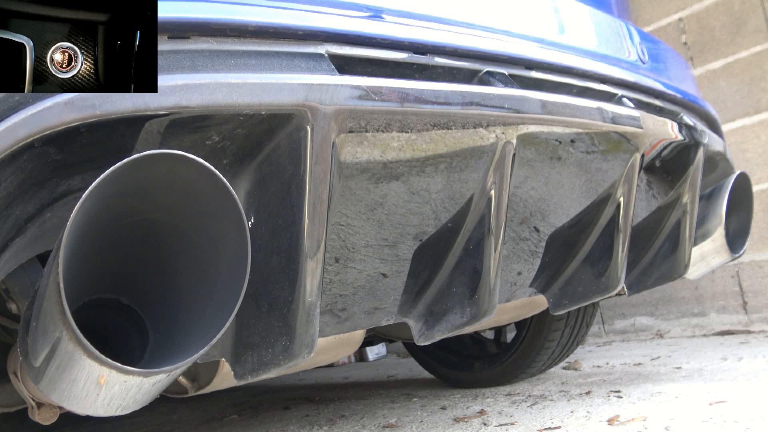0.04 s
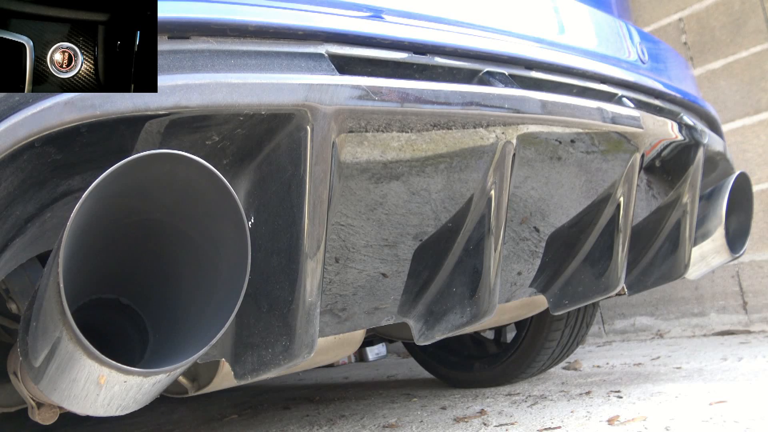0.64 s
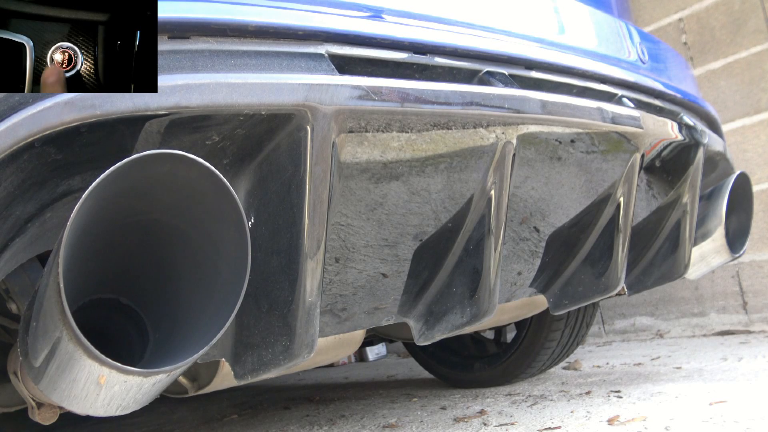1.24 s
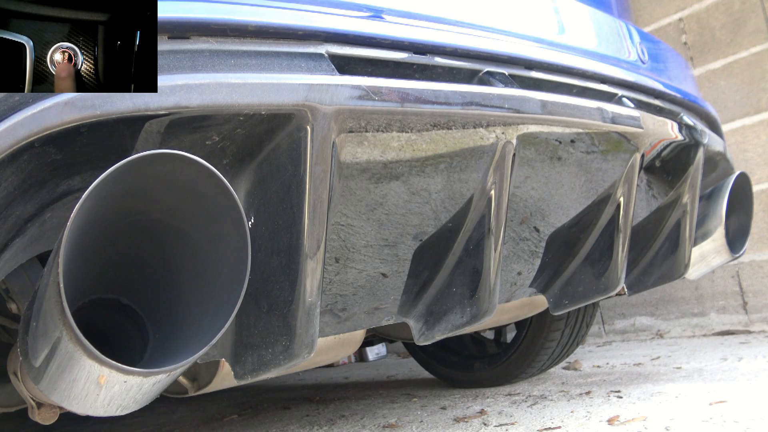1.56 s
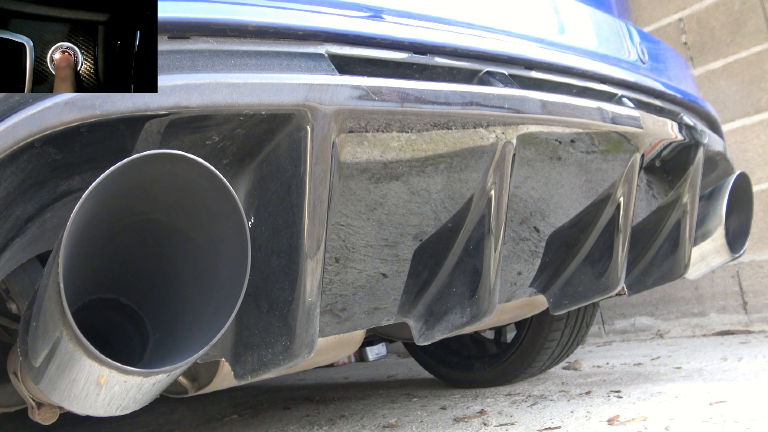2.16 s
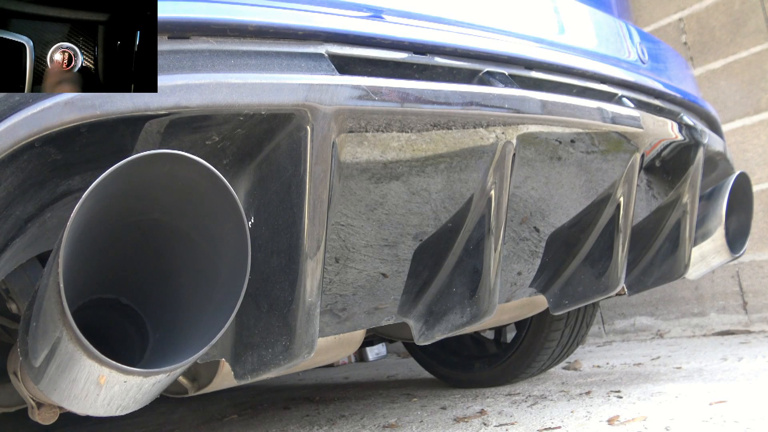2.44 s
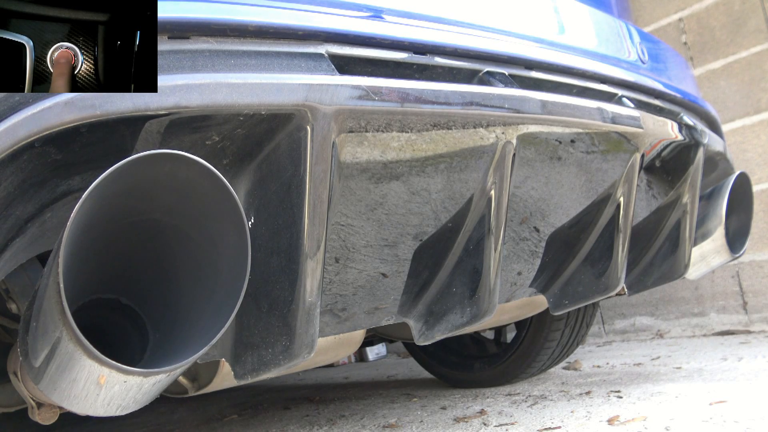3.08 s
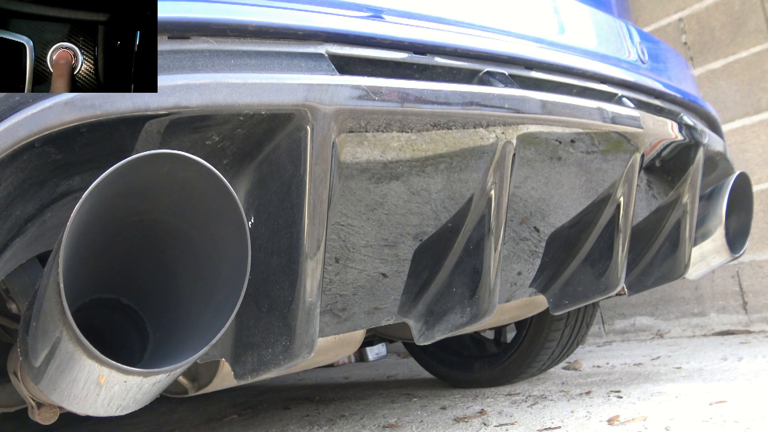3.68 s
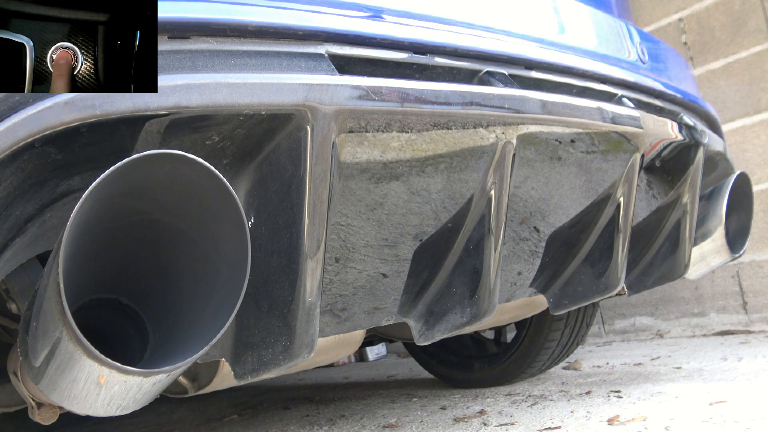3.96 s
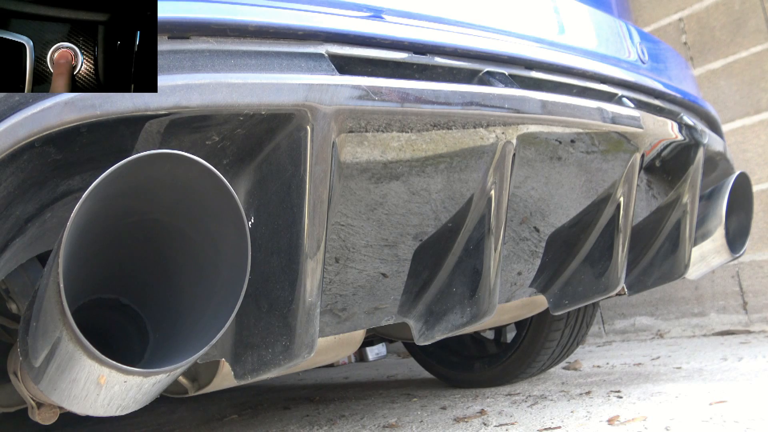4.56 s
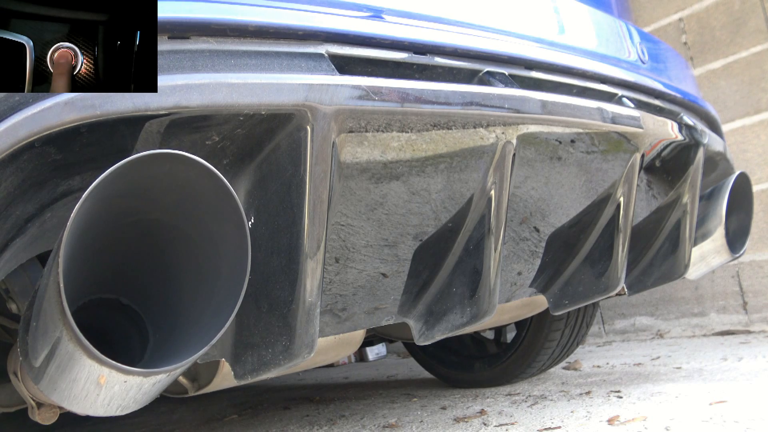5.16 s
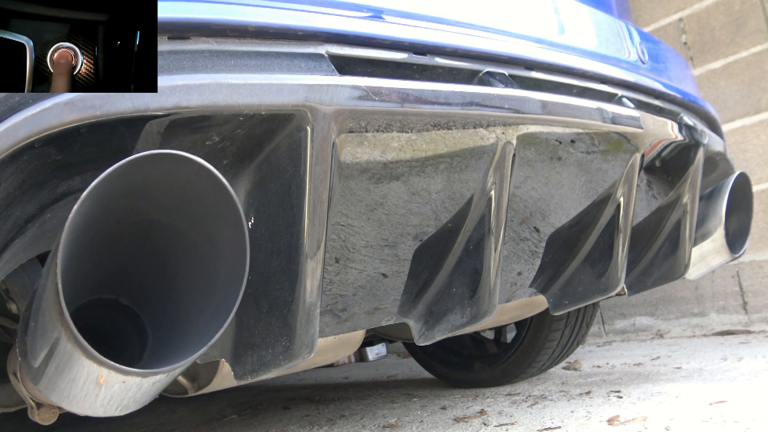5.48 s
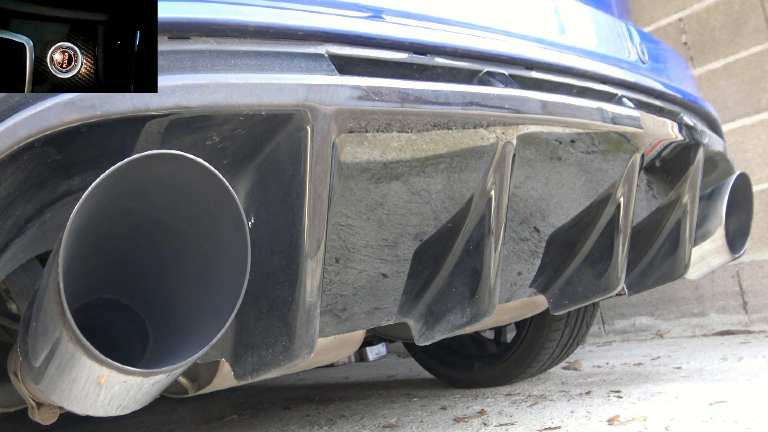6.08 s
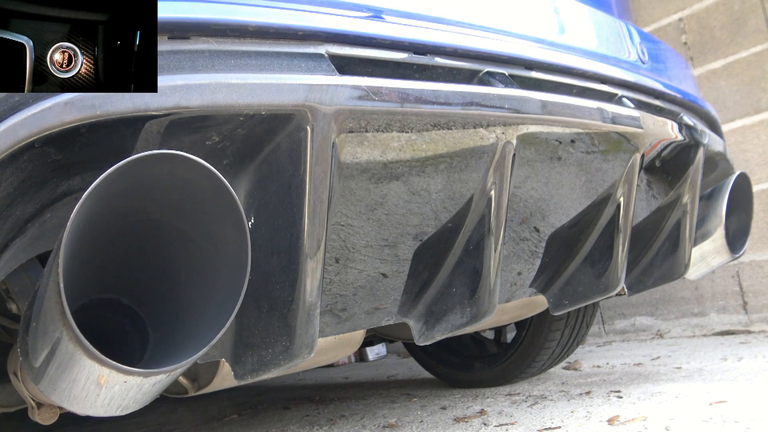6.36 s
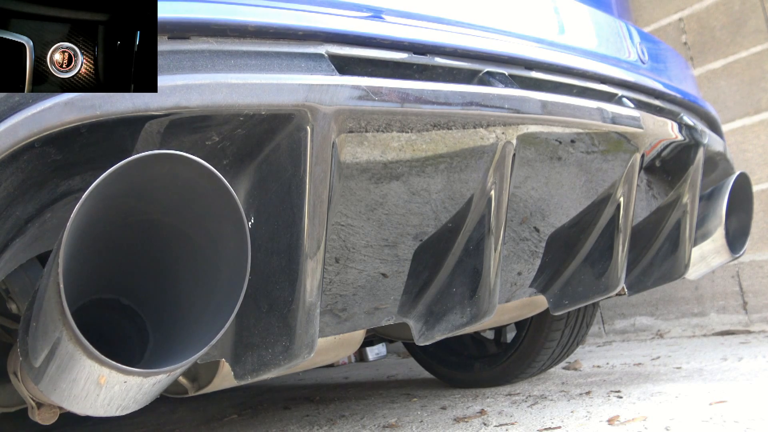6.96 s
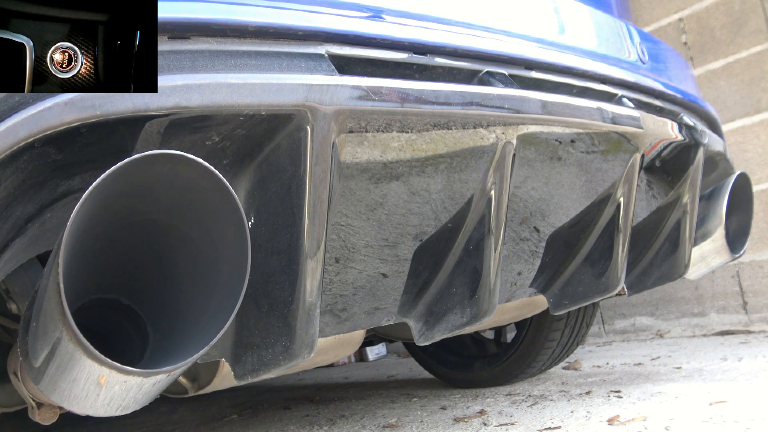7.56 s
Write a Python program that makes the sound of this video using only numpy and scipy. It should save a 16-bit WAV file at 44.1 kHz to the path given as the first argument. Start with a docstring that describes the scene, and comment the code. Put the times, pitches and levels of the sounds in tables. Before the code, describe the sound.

A car starts from cold, with the microphone close to the exhaust pipe outdoors. At first there is only faint still air with a few soft scuffs and dull knocks. Then come a clunk, a thin high whine and a short burst of metallic cranking with bass puffs. The engine fires loudly and raggedly, rises briefly in pitch and holds a deep, fast idle, rasping and hissing.

```python
"""Cold start of a car with five cylinders on each exhaust pipe, heard close to a tailpipe beside a wall.
Over a quiet yard come soft knocks and scuffs. A relay clunks and a pump whines up; the starter bites and
grinds while unfired cylinders puff through the silencer. The engine catches with a run of cracks, flares
briefly and settles into a fast, booming idle, each firing ringing the pipe and rasping out of its tip."""
import sys
import numpy as np
from scipy import signal
from scipy.fft import rfft, irfft
from scipy.io import wavfile

SR = 44100
rng = np.random.default_rng(int(sys.argv[2]) if len(sys.argv) > 2 else 0)


def int16_out(signal):
    """Quantize to a 16-bit WAV file."""
    q = np.round(np.clip(np.atleast_2d(signal).T, -1, 1) * 32767)
    wavfile.write(sys.argv[1], SR, q.astype(np.int16))


N = 345303
TIME = np.arange(N) / SR
BINS = np.maximum(np.arange(N // 2 + 1) * SR / N, 1)

# Levels are relative within each table; noise colours give the level per Hz.
# colour of the yard's still air: f/Hz, level/dB
YARD_AIR = [(13, -47), (22, -19), (44, 0), (76, -4.5), (102, -1.5), (135, -9), (220, -3.5), (267, -12),
            (306, -9), (625, -16.5), (869, -16.5), (2910, -35.5), (13900, -40), (15500, -46)]
# stereo width of the yard: f/Hz, side minus mid/dB
AIR_WIDTH = [(60, -25), (250, -16.5), (1200, -14), (2400, -19), (4400, -13), (8000, -1), (15000, -13)]
# balance of the yard and of the exhaust: f/Hz, left minus right/dB
AIR_PAN = [(60, -0.092), (240, -1.7), (950, -1.4), (3770, 0.24), (15000, 0.0)]
EXHAUST_PAN = [(60, -2.0), (110, -2), (200, 4.5), (380, 1.0), (700, 2.5), (1290, 1.5), (2380, 2.5),
               (4400, 2.5), (8120, 2.0), (15000, 0.5)]
# scuffs and rustles: t/s, level/dB, rise/s, t60/s, centre f/Hz, upper edge over centre
SCUFF_CUES = [(1.048, -57.5, 0.0033, 0.17, 6500, 1.7), (1.237, -43.5, 0.0027, 0.15, 2500, 2.2),
              (1.254, -43.5, 0.0054, 0.27, 1750, 1.5), (1.29, -43, 0.0031, 0.28, 8450, 1.4),
              (1.292, -47.5, 0.0028, 0.29, 5030, 1.12), (1.685, -54, .005, 0.34, 2500, 2.4),
              (1.745, -52.5, 0.037, 0.49, 1990, 2.0), (1.798, -42.5, 0.023, 0.22, 2200, 3.9),
              (4.617, -59, .004, .3, 4000, 2.3), (4.68, -49.5, 0.032, 0.36, 4000, 3.4),
              (4.775, -50, 0.0053, .8, 7000, 2.1)]
# dull knocks: t/s, level/dB, rise/s, t60/s, low cut f/Hz
KNOCK_CUES = [(1.115, -40.5, 0.035, 0.36, 280), (1.152, -55, .015, 0.21, 380),
              (1.42, -44.5, 0.022, .2, 230), (1.525, -45.5, .012, 0.17, 150), (1.81, -47, 0.12, .2, 130),
              (4.67, -47.5, 0.03, 0.2, 90), (4.789, -21.5, 0.014, 0.13, 80), (4.83, -43, .01, 0.39, 80),
              (4.885, -27, 0.023, 0.47, 130)]
# colours of the scuffs and of the knocks: f/Hz, level/dB
SCUFF_COLOUR = [(400, 13.5), (9000, -9), (15000, -13)]
KNOCK_COLOUR = [(50, -5), (110, 4.5), (170, 4), (220, -16), (320, 0.5), (560, -5), (750, -16.5),
                (1500, -25.5), (4000, -45)]
# ring of the relay: f/Hz, width/Hz, level/dB
RELAY_MODES = [(1420, 70, -4), (2313, 35, 9), (2880, 40, -8), (3270, 32, 0), (4220, 45, -12),
               (4900, 50, -7), (5450, 50, -13)]
# whine of the pump at nominal speed: f/Hz, level/dB
PUMP_PARTIALS = [(4790, -59), (9580, -50.5), (14370, -67)]
# colours of the pinion's slam, the gear mesh and the rasp of the teeth: f/Hz, level/dB
BITE_COLOUR = [(300, -8), (480, -6), (660, 10.5), (950, -19), (1300, -1), (2100, 4.5), (4000, -1.5),
               (6000, -9), (9000, -11), (15000, -30)]
MESH_COLOUR = [(90, 0), (200, -2), (320, 2.5), (480, -7.5), (650, -2), (1000, 0), (1350, -1), (1900, 1),
               (3000, -2), (4500, -7), (6000, -18)]
TEETH_COLOUR = [(3500, -4.5), (5200, -1), (7000, -2.5), (9000, -4), (11000, -9.5), (13000, -18),
                (15500, -35)]
# ring of the starter and bell housing: f/Hz, width/Hz, level/dB
HOUSING_MODES = [(318, 19, -9), (900, 22, 3), (1266, 42, 1.5), (1866, 77, 0.5), (2480, 56, -6),
                 (3276, 35, -4), (3670, 25, -3), (4470, 92, -18), (4700, 30, -3.5), (4950, 35, -12),
                 (5300, 270, -10), (5970, 130, -22)]
# the starter straining against each compression: t/s, level/dB, half length/s
STRAINS = [(4.99, -19, 0.094), (5.163, -16, 0.056), (5.314, -17.5, 0.058)]
# air pushed out by unfired cylinders: t/s, level/dB, f/Hz
PUFF_CUES = [(5.077, -13, 41), (5.221, -13, 45.6), (5.347, -10.5, 54.5)]
# sharp first firings: t/s, level/dB
CRACK_CUES = [(5.3948, -8.5), (5.4345, -14), (5.4884, -12.5), (5.51, -13), (5.5316, -11), (5.5737, -10),
              (5.677, -16.5), (5.709, -12)]
# colours of those cracks and of the uneven burns' rumble: f/Hz, level/dB
CRACK_COLOUR = [(500, 5), (3000, -1), (9000, -2), (15000, -16)]
RUMBLE_COLOUR = [(22, -2), (32, 0), (60, -2.5), (105, 0), (150, -9), (200, -8.5)]
# punch of each cylinder in firing order: level/dB
CYLINDERS = [0.9, 0.4, 0.3, -2.7, -0.8]
# notes above the boom, and the growl of unequal cylinders: multiple of the firing rate, level/dB
BOOM_OVERTONES = [(2, 0.5), (3, -2.5), (4, -12.5)]
GROWL_ORDERS = [(3.4, -6), (3.6, -5), (4.4, -7), (4.6, 2.5), (4.8, -4), (5.4, -1), (5.6, -5), (6.4, -8),
                (8, -8), (8.6, -6), (13, -14), (16.6, -12)]
# ring of the pipe, and of its tip under the gas jet: f/Hz, width/Hz, level/dB
PIPE_MODES = [(250, 23, -9.5), (341.6, 48, 0), (373.5, 48, -1), (447.6, 40.5, -4), (503, 44, -9.5),
              (557, 27, -6), (599, 25.4, -4.5), (692.3, 76, -12.5)]
TIP_MODES = [(794, 112, -4), (918, 64, 0), (1056, 86, -2), (1181, 80, 3), (1308, 99, -1), (1456, 122, -4.5),
             (1840, 132, -8), (2260, 260, -11), (2850, 236, -11.5), (3370, 280, -16.5)]
# colour of the jet at the rim: f/Hz, level/dB
JET_COLOUR = [(2000, -6.5), (3500, -3.5), (4100, -11), (4900, -11), (5600, -5.5), (6300, -2), (7000, -5),
              (7900, -2.5), (9100, -2), (10300, -9.5), (11500, -10), (13500, -18), (15500, -24)]
# flow of exhaust gas, as the fader on its hiss: t/s, level/dB
GAS_FLOW = [(5.42, -28), (5.55, -31), (5.7, -27.5), (5.76, -31), (6.91, -38), (7.22, -33.5), (7.8, -33)]

PUMP_ON_S, BITE_S, CATCH_S = 4.765, 4.868, 5.39
CATCH_HZ, IDLE_HZ = 45.02, 70.22   # firing rates
FLARE_HZ, FLARE_AT_S = 6.3, 5.935   # overshoot of the firing rate


def from_db(db):
    """Decibels to gain."""
    return 10 ** (np.asarray(db) / 20)


def rms_one(x):
    """Scale to rms 1."""
    return x / np.sqrt(np.mean(x ** 2) + 1e-20)


def at_bins(points):
    """A spectrum table at every frequency."""
    hz, value = np.transpose(points)
    return np.interp(np.log(BINS), np.log(hz), value)


def noise(colour):
    """Steady coloured noise, rolled off steeply past the table's ends; rms 1."""
    low_cut = 1 + (.8 * colour[0][0] / BINS) ** 6
    high_cut = 1 + (.8 * BINS / colour[-1][0]) ** 6
    eq = from_db(at_bins(colour)) / np.sqrt(low_cut * high_cut)
    return rms_one(irfft(rfft(rng.standard_normal(N)) * eq, N))


def drift(hz):
    """Random modulator, smoothed above hz; rms 1."""
    hop, run_in = 40, 2000
    r = np.exp(-2 * np.pi * hz * hop / SR)
    slow = signal.lfilter([1], [1, -2 * r, r * r], rng.standard_normal(N // hop + run_in + 2))[run_in:]
    return np.interp(np.arange(N) / hop, np.arange(len(slow)), rms_one(slow))


def resonate(x, modes):
    """Parallel resonators of alternating polarity."""
    out = 0
    for k, (hz, width, db) in enumerate(modes):
        r = np.exp(-np.pi * width / SR)
        ring = signal.lfilter([1, 0, -1], [1, -2 * r * np.cos(2 * np.pi * hz / SR), r * r], x)
        out = out + (-1) ** k * from_db(db) * (1 - r * r) / 2 * ring
    return out


def swell(s, rise, t60):
    """An envelope that grows to 1 at time s and dies away."""
    attack, decay = (TIME - s) / rise, (s - TIME) * np.log(1000) / t60
    return np.exp(np.maximum(np.minimum(attack, decay), -20))


def opens(s, length):
    """A smooth fade from 0 to 1 around time s."""
    return .5 + .5 * np.tanh((TIME - s) / length)


def hump(s, length):
    """A smooth rise to 1 at time s and back."""
    return np.exp(-np.minimum(((TIME - s) / length) ** 2, 40))


def pan(x, side_db):
    """Place a source, louder on the left by side_db."""
    return x * from_db(np.array([[.5], [-.5]]) * side_db)


def pan_by_band(x, sides):
    """Place a source whose balance changes with frequency."""
    return irfft(rfft(x) * from_db(np.array([[.5], [-.5]]) * at_bins(sides)), N)


def yard(level_db=-50):
    """The bed: distant outdoor rumble, centred in the bass, under a wider faint hiss."""
    side = irfft(rfft(noise(YARD_AIR)) * from_db(at_bins(AIR_WIDTH)), N)
    mid = pan_by_band(noise(YARD_AIR), AIR_PAN)
    return from_db(level_db) * (mid + side * [[1], [-1]]) * opens(0.059, 0.0027)


def scuffs(grain_db=0.5):
    """Short scuffs and mechanical rustles: band-passed bursts of grit."""
    grit = noise(SCUFF_COLOUR) * from_db(grain_db * drift(200))
    out = 0
    for s, db, rise, t60, hz, ratio in SCUFF_CUES:
        band = signal.butter(1, [hz / ratio, hz * ratio], "band", fs=SR, output="sos")
        out += from_db(db) * swell(s, rise, t60) * rms_one(signal.sosfilt(band, grit))
    return out


def knocks():
    """Dull knocks through the car's body: bursts of dark noise."""
    body = noise(KNOCK_COLOUR)
    out = 0
    for s, db, rise, t60, hz in KNOCK_CUES:
        low_cut = signal.butter(2, hz, "high", fs=SR, output="sos")
        out += from_db(db) * swell(s, rise, t60) * rms_one(signal.sosfilt(low_cut, body))
    return out


def relay(level_db=-38):
    """A relay snaps shut and rings."""
    ring = rms_one(resonate(rng.standard_normal(N), RELAY_MODES))
    return from_db(level_db) * swell(PUMP_ON_S + 0.01, 0.0037, 0.27) * ring


def pump(spin_up_s=.009, sag_per_s=0.19, flutter=0.0071):
    """A small electric pump whines up to speed and sags under load."""
    age = np.maximum(TIME - PUMP_ON_S, 0)
    speed = 1.02 - .5 * np.exp(-age / spin_up_s)
    speed *= 1 - sag_per_s * np.minimum(age, .3) + flutter * drift(250)
    phase = 2 * np.pi * np.cumsum(speed) / SR
    whine = sum(from_db(db + 3 * drift(40)) * np.sin(hz * phase) for hz, db in PUMP_PARTIALS)
    return whine * opens(PUMP_ON_S + .027, 0.0087) * (1 - opens(4.95, 0.042))


def underbody(x, wet_db, t60=0.12):
    """Add the tight metallic reverb between ground and floor pan; rms 1."""
    age = np.arange(SR // 8) / SR
    echoes = rng.standard_normal(len(age)) * np.exp(-np.log(1000) * age / t60)
    wet = signal.fftconvolve(x, echoes / np.linalg.norm(echoes))[:N]
    return rms_one(x + from_db(wet_db) * wet)


def starter_faders(free_db=-27.5, treble_db=-39, jolt_db=-17.5, jolt_treble_db=-24, lift_db_per_s=22):
    """Gains of grind and treble: a jolt at the bite, a surge per compression, brighter with speed."""
    surges = sum((from_db(db) * hump(s, length)) ** 2 for s, db, length in STRAINS)
    strain = np.sqrt(from_db(free_db) ** 2 + surges)
    strain_db = 20 * np.log10(strain) - free_db
    cranked_s = np.clip(TIME, BITE_S, CATCH_S) - STRAINS[0][0]
    treble = from_db(treble_db + .7 * strain_db + lift_db_per_s * cranked_s)
    jolt = swell(BITE_S + 0.024, .2, 0.23)
    return np.hypot(strain, from_db(jolt_db) * jolt), np.hypot(treble, from_db(jolt_treble_db) * jolt)


def housing(teeth, tilt_per_s=10, wander_db=2.4):
    """Shifting tooth contact rings now one mode, now another; the highs gain as the starter speeds up."""
    full_speed_s = STRAINS[1][0]
    db_per_octave = tilt_per_s * (np.clip(TIME, BITE_S, full_speed_s) - full_speed_s)
    scrape = rng.standard_normal(N) * teeth
    ring = 0
    for mode in HOUSING_MODES:
        octaves = np.log2(max(mode[0], 900) / 2200)
        ring += resonate(scrape, [mode]) * from_db(wander_db * drift(7.1) + db_per_octave * octaves)
    return rms_one(ring)


def starter(teeth_hz=310, ring_db=-3.5, mesh_db=-2.8, whine_db=-38, bite_db=-17, fade_db_per_s=45):
    """The pinion slams into the ring gear, grinds tooth by tooth and dies away once the engine fires."""
    grind_gain, treble_gain = starter_faders()
    tooth = np.sin(2 * np.pi * np.cumsum(teeth_hz * (1 + .04 * drift(5))) / SR)
    teeth = (1 + 0.24 * tooth) * from_db(0.07 * drift(150))
    ring = from_db(ring_db) * housing(teeth)
    mesh = from_db(mesh_db) * underbody(noise(MESH_COLOUR), wet_db=-6) * teeth
    grind = grind_gain * (ring + mesh) + from_db(whine_db) * tooth
    treble = treble_gain * underbody(noise(TEETH_COLOUR), wet_db=-2) * teeth
    release_db = -fade_db_per_s * np.maximum(TIME - CATCH_S, 0) - 4.3 * opens(CATCH_S, 0.0081)
    bite = from_db(bite_db) * swell(BITE_S + 0.0061, 0.0062, 0.25) * noise(BITE_COLOUR)
    return (grind + treble) * opens(BITE_S, 0.0079) * from_db(release_db) + bite * teeth


def puffs(length_s=0.06, skew=-0.41):
    """Unfired cylinders push lopsided bass puffs through the silencer."""
    out = 0
    for s, db, hz in PUFF_CUES:
        age = np.maximum(TIME - s, 0)
        phase = 2 * np.pi * hz * age
        out += from_db(db) * np.sin(phase) * (1 + skew * np.cos(phase)) * np.exp(-(age / length_s) ** 2)
    return out


def first_firings(crack_db=-9, punch_db=-3, punch_hz=88):
    """Each sharp firing cracks and kicks the air in the silencer."""
    burst = noise(CRACK_COLOUR)
    out = 0
    for s, db in CRACK_CUES:
        punch = np.sin(2 * np.pi * punch_hz * (TIME - s))
        out += from_db(db + crack_db) * swell(s + 0.0017, 0.00064, 0.018) * burst
        out += from_db(db + punch_db) * swell(s + .004, 0.0023, 0.071) * punch
    return out


def firing_rate(hunt_hz=.8, hunt_period_s=.95):
    """Firings per second: a climb to idle, one flare, then gentle hunting."""
    hunt = hunt_hz * np.cos(2 * np.pi * (TIME - 6.45) / hunt_period_s)
    climb = (IDLE_HZ - CATCH_HZ + hunt) * opens(5.62, .085)
    return CATCH_HZ + climb + FLARE_HZ * hump(FLARE_AT_S, .15)


def tones(firings, orders, waver, dispersion):
    """Partials locked to the firings; the pipe delays the higher ones, and their phases waver."""
    out = 0
    for k, db in orders:
        phase = 2 * np.pi * k * firings - dispersion * (k - 1) ** 2
        out += from_db(db) * np.cos(phase + waver * drift(12.3))
    return rms_one(out)


def engine_notes(firings, rate, surge_db, ragged, throb_period_s=0.765):
    """Pressure waves sound a boom, its overtones and a drone at five times the firing rate."""
    slow = np.clip((IDLE_HZ - rate) / (IDLE_HZ - CATCH_HZ), 0, 1)
    flare = hump(FLARE_AT_S - .02, 0.075)
    settled = opens(6.03, 0.087)
    throb = settled * np.cos(2 * np.pi * (TIME - 6.17) / throb_period_s)
    # the boom gives way to the overtones in the flare, and to the drone on each throb
    boom_db = -11.5 - 3 * ragged - 4.5 * flare - throb + drift(35) * (0.43 + ragged)
    overtone_db = -21.9 + 6.5 * flare
    drone_db = -25 + 0.61 * surge_db - 14 * slow ** 2 + 1.5 * (1 - settled) + 5 * throb
    lagged = firings - 0.493
    boom = np.sqrt(2) * np.cos(2 * np.pi * lagged)
    overtones = tones(lagged, BOOM_OVERTONES, waver=0.41 + 0.26 * ragged, dispersion=0.83)
    drone = tones(firings, [(5, 0)], waver=.25 + .55 * ragged, dispersion=0)
    return from_db(boom_db) * boom + from_db(overtone_db) * overtones + from_db(drone_db) * drone


def rumble(ragged, idle_db=-35, stumble_db=-18):
    """Uneven burns fill the gaps between the low notes."""
    return noise(RUMBLE_COLOUR) * (from_db(idle_db) + from_db(stumble_db) * ragged * opens(5.41, 0.029))


def blowdown(firings, strength, delay, fall, steady):
    """Envelope of a gas jet at each valve opening, over a steady stream; delay and fall in firings."""
    late = np.maximum(firings - delay, 0)
    age = late % 1
    jet = (1 - np.exp(-age * 20)) * np.exp(-age / fall)
    return rms_one(steady + strength[late.astype(int)] * jet)


def pipe_bark(firings, strength, surge_db, ragged, thump_db=-4, gust_db=-3, growl_db=-1, fill_s=0.033):
    """Pressure steps and gusts ring the pipe over a growl, building as it fills, hardest while ragged."""
    steps = np.diff(np.floor(firings), prepend=np.floor(firings[0]))
    steps = steps * strength[firings.astype(int)] + 1e-18
    gusts = rng.standard_normal(N) * blowdown(firings, strength, delay=0, fall=0.35, steady=0.64)
    bark = from_db(thump_db) * rms_one(resonate(steps, PIPE_MODES))
    bark += from_db(gust_db) * rms_one(resonate(gusts, PIPE_MODES))
    bark += from_db(growl_db) * tones(firings, GROWL_ORDERS, waver=0.4 + 0.99 * ragged, dispersion=2.305)
    empty = np.exp(-np.maximum(TIME - CATCH_S, 0) / fill_s)
    return from_db(-25 + 0.041 * surge_db + 3.5 * ragged - 14 * empty) * bark


def tip_jet(firings, strength, flow_db, surge_db, ragged, crackle_db=1.14):
    """The pulsing jet crackles in the tip and hisses at the rim, riding the gas flow."""
    crackle = rng.standard_normal(N) * from_db(crackle_db * drift(300))
    crackle *= blowdown(firings, strength, delay=0.0078, fall=0.083, steady=0.13)
    stream = noise(JET_COLOUR) * blowdown(firings, strength, delay=0.089, fall=0.19, steady=0.34)
    rasp = underbody(resonate(crackle, TIP_MODES), wet_db=-6.5)
    hiss = underbody(stream, wet_db=-11)
    return from_db(-27.5 + 0.43 * surge_db - 2 * ragged) * rasp + from_db(flow_db + 1.5) * hiss


def engine(jitter=0.0021, uneven_db=1.1):
    """Each firing sends a pressure wave and a jet down the pipe; burns are ragged until speed is up."""
    rate = firing_rate()
    ragged = 1 - opens(5.7, 0.052)
    flow_db = np.interp(TIME, *np.transpose(GAS_FLOW))
    surge_db = flow_db - np.median(flow_db[TIME > CATCH_S])
    firings = np.cumsum(rate * (1 + jitter * drift(25))) / SR
    firings = firings - np.interp(CATCH_S, TIME, firings) + 400   # a firing lands right on the catch
    strength = from_db(np.resize(CYLINDERS, 1000) + uneven_db * rng.standard_normal(1000))
    lows = engine_notes(firings, rate, surge_db, ragged) + rumble(ragged)
    bark = pipe_bark(firings, strength, surge_db, ragged)
    jet = tip_jet(firings, strength, flow_db, surge_db, ragged)
    return (lows + bark + jet) * opens(CATCH_S, 0.006)


def wall(x, echo_db=-21, left_s=(.0071, .0193), right_s=(.0078, .019)):
    """Faint slaps off ground and wall, a little different on each side, without the bass."""
    bright = signal.sosfilt(signal.butter(2, 700, "high", fs=SR, output="sos"), x)
    slaps = [sum(np.interp(TIME - lag, TIME, bright, left=0) for lag in lags)
             for lags in (left_s, right_s)]
    return from_db(echo_db) * np.array(slaps)


def scene():
    """The mix: tailpipe up front, starter under the car, the yard all around."""
    exhaust = puffs() + engine() + first_firings()
    cranking = starter() + pump() + relay()
    car = pan_by_band(exhaust, EXHAUST_PAN) + pan(cranking, 3.24) + wall(exhaust + cranking)
    return car + pan(knocks(), 2.0) + pan(scuffs(), 3.3) + yard()


def record(dry):
    """Master chain: soft-clip the peaks, then a steep high cut."""
    ceiling, cutoff_hz = .95, 15600
    rounded = dry / (1 + (dry / ceiling) ** 8) ** (1 / 8)
    return signal.sosfilt(signal.ellip(10, .1, 80, cutoff_hz, fs=SR, output="sos"), rounded)


dry = scene()
out = record(dry)
int16_out(out)
```